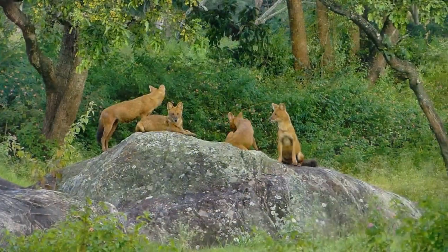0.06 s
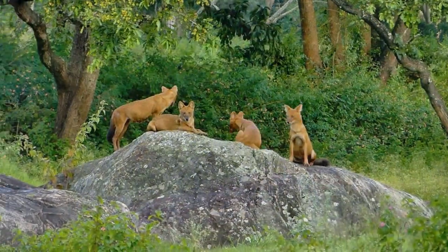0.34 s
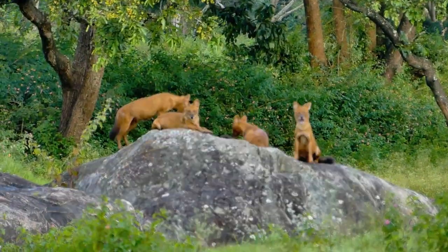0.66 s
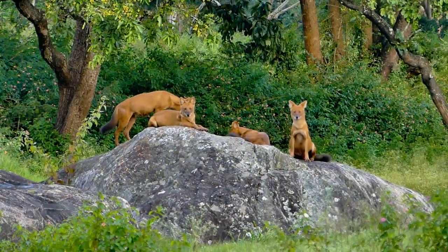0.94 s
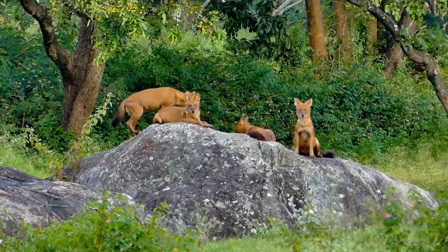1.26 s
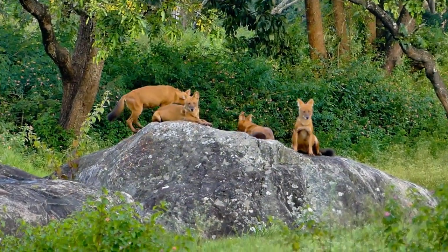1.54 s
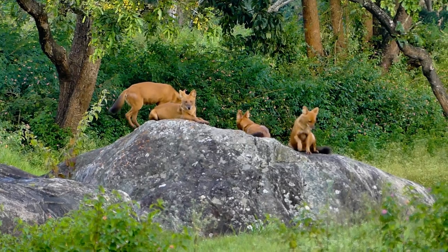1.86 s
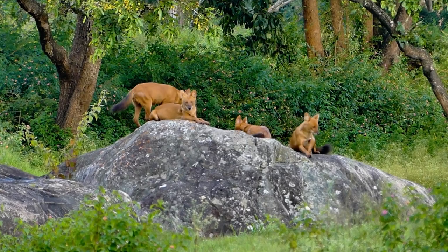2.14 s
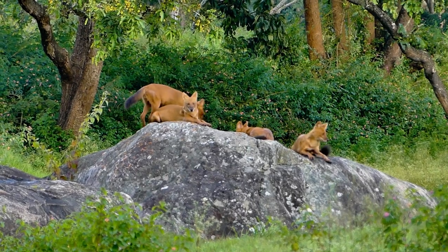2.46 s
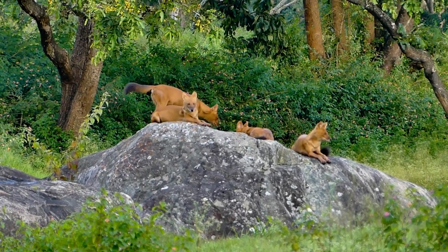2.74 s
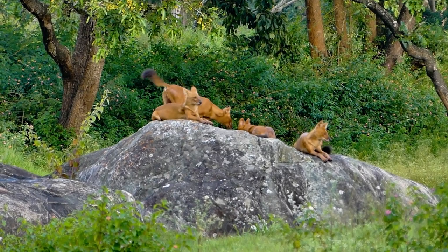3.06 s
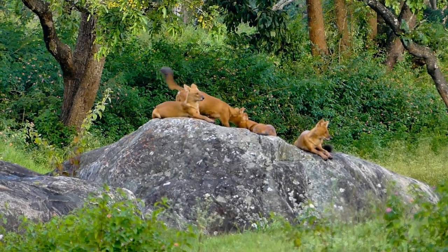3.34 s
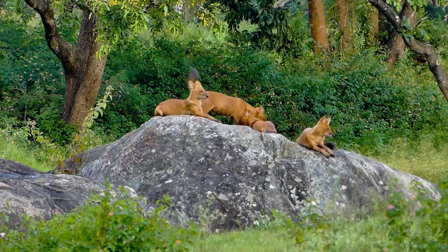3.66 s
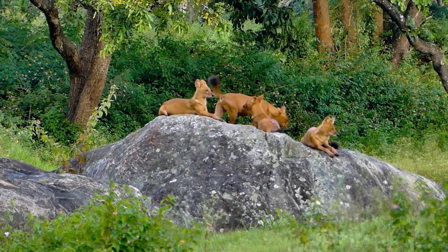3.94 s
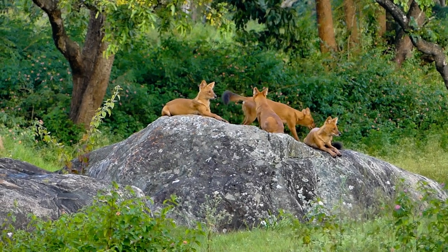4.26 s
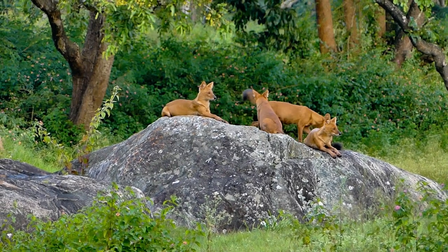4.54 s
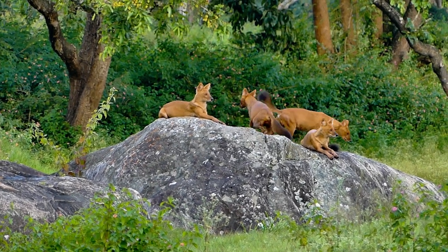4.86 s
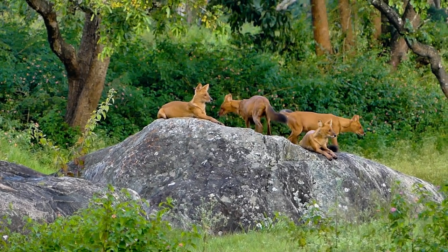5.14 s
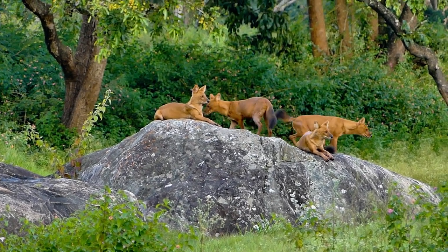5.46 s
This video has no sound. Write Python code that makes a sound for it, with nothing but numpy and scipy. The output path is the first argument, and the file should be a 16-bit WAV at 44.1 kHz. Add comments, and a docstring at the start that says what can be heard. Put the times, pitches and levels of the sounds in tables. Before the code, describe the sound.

A high, shrill chorus of far insects fills a forest clearing throughout, with faint cricket trills and a gentle hiss of foliage beneath it. Rapid raspy chirps open the scene and stop, while a quiet buzz comes three times. Two tiny pips sound from the undergrowth, followed by three fading whistles from a distant bird and one brief twitter, each lightly echoing among the trees.

```python
"""A forest clearing. From the start, countless far insects shrill over a wash of foliage, and two
tree crickets trill, one nearly pure note to each wing closure. For two seconds a bush cricket chirps,
tooth strikes ringing its wing; another joins with the first of three buzzing bouts. Two tiny pips
come from the undergrowth, then a far bird whistles three times, and near the end a small one twitters.
Trunks and leaves scatter each call into a short reverberation."""
import sys
import numpy as np
from scipy import signal
from scipy.fft import rfft, irfft, next_fast_len
from scipy.io import wavfile

SR = 44100
rng = np.random.default_rng(int(sys.argv[2]) if len(sys.argv) > 2 else 0)


def to_wav(sig):
    """Store sig (one row per channel, or 1-D mono) as 16-bit WAV at the path in sys.argv[1].

    Samples outside -1..1 are clipped; the rate is SR.
    """
    pcm = np.clip(np.atleast_2d(sig), -1, 1) * 32767
    pcm = np.round(pcm).astype(np.int16)
    wavfile.write(sys.argv[1], SR, pcm.T)  # frames by channels


N = 251811
TIME = np.arange(N) / SR


def from_db(db):
    """Amplitude ratio: tenfold for every 20 dB."""
    return 10 ** (np.asarray(db) / 20)


def rms_one(x):
    """Normalisation to unit mean power."""
    return x / np.sqrt(np.mean(x ** 2) + 1e-20)


def filtered(x, gain_at):
    """Linear filtering: each frequency of x is weighted by gain_at(hz)."""
    size = next_fast_len(N + 8192)
    hz = np.maximum(np.arange(size // 2 + 1) * SR / size, 1)
    return irfft(rfft(x, size) * gain_at(hz), size)[:N]


def coloured(x, spectrum):
    """Spectral shaping by a curve of (frequency_hz, level_db) points; rms 1."""
    points, levels = np.transpose(spectrum)
    return rms_one(filtered(x, lambda hz: from_db(np.interp(np.log(hz), np.log(points), levels))))


def drift(rate_hz):
    """Random fluctuation: low-passed noise of rms 1."""
    return rms_one(filtered(rng.standard_normal(N), lambda hz: np.exp(-(hz / (rate_hz + 1)) ** 2)))


def tone(hz):
    """A sine of rms 1 whose phase is the integral of its frequency."""
    return np.sqrt(2) * np.sin(2 * np.pi * np.cumsum(hz) / SR)


def gate(start_s, end_s, edge_s):
    """A trapezoidal envelope, open between two times."""
    return np.clip(np.minimum(TIME - start_s, end_s - TIME) / edge_s + .5, 0, 1)


def rasp(centre_hz, width_hz):
    """Resonance: tooth strikes, too dense to count, drive a wing to a band of noise; rms 1."""
    noise = rng.standard_normal(N)
    return rms_one(filtered(noise, lambda hz: 1 / (1 + (2 * (hz - centre_hz) / width_hz) ** 4)))


def strokes(per_s, sharpness, wander):
    """Amplitude modulation: one swell for each wing stroke, at a slightly unsteady rate; rms 1."""
    turns = np.cumsum(per_s * (1 + wander * drift(4))) / SR + rng.random()
    return rms_one(np.exp(sharpness * np.cos(2 * np.pi * turns)))


def forest(x, wet, t60_s):
    """Scattering: echoes from trunks decay exponentially; wet is their share of the power."""
    age = np.arange(SR) / SR
    echoes = rng.standard_normal(SR) * from_db(-60 * age / t60_s) * (1 - np.exp(-age / 0.012))
    cloud = signal.fftconvolve(x, echoes)[:N]
    return np.sqrt(1 - wet) * x + np.sqrt(wet) * np.std(x) * rms_one(cloud)


def breeze(corner_hz=60, gust_db=7.5):
    """Pressure fluctuation: slight puffs of air make an uneven rumble; rms 1."""
    rumble = filtered(rng.standard_normal(N), lambda hz: 1 / (1 + (hz / corner_hz) ** 2))
    return rms_one(rumble * from_db(gust_db * drift(8)))


def foliage():
    """Broadband noise: far leaves merge into a steady wash; rms 1."""
    # relative spectrum of the leaves: frequency_hz, level_db
    leaf_spectrum = [(25, -33), (90, -29), (170, -27), (260, -22), (400, -17.5), (630, -12), (950, -7),
                     (1700, -1.7), (3000, 0), (5000, 1), (11000, 1.04), (16000, -0.2)]
    return coloured(rng.standard_normal(N), leaf_spectrum)


def chorus(groups=4):
    """Incoherent summation: far insects pulse out of step and blur into a shrill band and its overtone."""
    # relative spectra of the two bands: frequency_hz, level_db
    shrill_band = [(3000, -88), (4950, -53.5), (5500, -26), (6000, -20), (6500, -7.5), (6900, -2.5),
                   (7250, 0), (8000, -3), (8500, -8.5), (9100, -13.5), (9500, -23.5), (10000, -32.5),
                   (11000, -44.5)]
    overtone_band = [(6000, -84.5), (11000, -28), (12100, -17.5), (13050, -7), (13850, -1), (14550, 3),
                     (15250, -1), (15750, -3), (17000, -29)]
    rates_hz = np.linspace(83, 87, groups)
    buzz = sum(rng.standard_normal(N) * strokes(hz, sharpness=0.15, wander=.012) for hz in rates_hz)
    shrill = from_db(-39) * coloured(buzz, shrill_band)
    overtone = from_db(-53) * coloured(buzz, overtone_band)
    return from_db(0.14 * drift(2.6)) * (shrill + overtone)


def pips(half_width_s=0.011, fall=0.081):
    """Frequency glides under Gaussian envelopes: tiny falling notes from the undergrowth."""
    # brief notes: centre_s, pitch_hz, level_db
    notes = [(.376, 5270, -62), (2.45, 4750, -65)]
    out = np.zeros(N)
    for centre_s, hz, db in notes:
        along = (TIME - centre_s) / half_width_s
        out += from_db(db) * np.exp(-.5 * along ** 2) * tone(hz * (1 - fall * np.tanh(along)))
    return forest(out, wet=0.32, t60_s=0.29)


def bird(notes, attack_s, release_s, scoop_hz, scoop_s, warble_per_s, warble_hz, rough_hz, undertone_db):
    """Frequency modulation: each note scoops up and warbles, with a faint subharmonic an octave below."""
    turns = np.cumsum(warble_per_s * (1 + .25 * drift(30))) / SR
    warble = warble_hz * np.sin(2 * np.pi * turns) + rough_hz * drift(240)
    out = np.zeros(N)
    for start, length, top_hz, db in notes:
        age = np.maximum(TIME - start, 0)
        level = np.clip(np.minimum(age / attack_s, (length - age) / release_s), 0, 1)
        hz = top_hz - scoop_hz * np.exp(-age / scoop_s) + warble
        out += from_db(db) * level * (tone(hz) + from_db(undertone_db) * tone(hz / 2))
    return out


def far_bird():
    """Whistles from far off, where the reverberant field outweighs the direct sound."""
    # one whistle and two weaker ones: start_s, length_s, top_pitch_hz, level_db
    whistles = [(2.81, 0.25, 1897, -62.5), (3.08, 0.16, 1930, -68.5), (3.41, 0.26, 1896, -75.5)]
    song = bird(whistles, attack_s=0.066, release_s=.08, scoop_hz=330, scoop_s=.06,
                warble_per_s=40, warble_hz=52, rough_hz=46, undertone_db=-25)
    return forest(song, wet=0.78, t60_s=0.54)


def small_bird():
    """A fast warble spreads a high note into sidebands, heard as a buzzy twitter."""
    # one note: start_s, length_s, top_pitch_hz, level_db
    twitter = [(5.07, 0.15, 4600, -56.5)]
    song = bird(twitter, attack_s=.05, release_s=.04, scoop_hz=248, scoop_s=.025,
                warble_per_s=100, warble_hz=190, rough_hz=125, undertone_db=-38)
    return forest(song, wet=0.81, t60_s=0.32)


def tree_cricket(trills, pitch_hz, sweep_hz, half_width_s, uneven_db, jitter_hz):
    """Stridulation: each wing closure is a short, nearly pure note that slides up in pitch; rms 1."""
    level, slide = np.zeros(N), np.zeros(N)
    for start, end, first_rate, last_rate in trills:
        rate = np.interp(TIME, [start, end], [first_rate, last_rate])
        turns = np.cumsum(rate) / SR - start * first_rate
        along = (turns - np.round(turns)) / rate / half_width_s  # 0 in the middle of a stroke
        singing = (turns > -.5) & (TIME < end)
        level += singing * np.exp(-.5 * along ** 2)
        slide += singing * np.tanh(along)
    level *= from_db(uneven_db * drift(19))
    return rms_one(level * tone(pitch_hz + sweep_hz * slide + jitter_hz * drift(113.8)))


def tree_cricket_pair():
    """Two pulse trains, one near and one farther, slip in and out of step as their rates differ."""
    # trills of each cricket: start_s, end_s, first_pulse_rate_hz, last_pulse_rate_hz
    near_trills = [(.0125, .5, 42.4, 42.4), (.5196, 5.72, 42.41, 42.34)]
    far_trills = [(.0105, 5.72, 43.7, 43.93)]
    near = from_db(-60.5) * tree_cricket(near_trills, pitch_hz=3748, sweep_hz=71.5,
                                         half_width_s=0.0023, uneven_db=1.93, jitter_hz=21.5)
    far = from_db(-68.5) * tree_cricket(far_trills, pitch_hz=4284, sweep_hz=90,
                                        half_width_s=.003, uneven_db=1.5, jitter_hz=45.76)
    return forest(near, wet=.18, t60_s=0.56) + forest(far, wet=0.17, t60_s=0.34)


def buzzing_bush_cricket(pitch_hz=5690, growth_db=4, rise_hz=70):
    """Wing strokes modulate a tone into a narrow buzz that grows and rises through each bout."""
    # bouts of buzzing: start_s, end_s, final_level_db
    bouts = [(0.3, 0.949, -63), (2.405, 3.047, -62.5), (4.806, 5.39, -61)]
    level, effort = np.zeros(N), np.zeros(N)
    for start, end, db in bouts:
        singing = gate(start, end, edge_s=0.018)
        level += from_db(db) * singing
        effort += singing * np.clip((TIME - end) / (end - start), -1, 0)  # 0 at the end of a bout
    level *= from_db(growth_db * effort) * strokes(per_s=94, sharpness=1.5, wander=0.0081)
    return level * tone(pitch_hz + rise_hz * effort + 55 * drift(200))


def chirping_bush_cricket(count=11, first_s=.06, every_s=.195, length_s=0.14):
    """Stridulation in an even run of chirps: in each, a dozen strokes excite the wing resonance."""
    starts = first_s + every_s * np.arange(count)
    level = from_db(-52.5) * sum(gate(start, start + length_s, edge_s=0.012) for start in starts)
    return level * strokes(per_s=87.5, sharpness=1.8, wander=0.01) * rasp(centre_hz=6330, width_hz=770)


def scene():
    """Superposition: the steady background and the single callers add in one channel."""
    air = from_db(-111) * breeze() + from_db(-58) * foliage()
    distant_crickets = from_db(-65) * rasp(centre_hz=3900, width_hz=880)
    background = air + distant_crickets + chorus()
    calls = pips() + far_bird() + small_bird()
    bush_crickets = forest(buzzing_bush_cricket() + chirping_bush_cricket(), wet=0.052, t60_s=0.25)
    return (background + calls + tree_cricket_pair() + bush_crickets)[None]


def record(dry):
    """Band limiting: a steep low-pass filter removes the highest treble."""
    cutoff_hz, edge_hz = 15770, 60
    return filtered(dry[0], lambda hz: np.clip((cutoff_hz - hz) / edge_hz + .5, 0, 1))[None]


dry = scene()
out = record(dry)
to_wav(out)
```